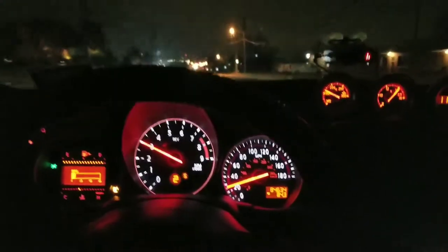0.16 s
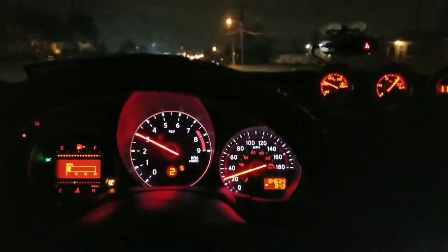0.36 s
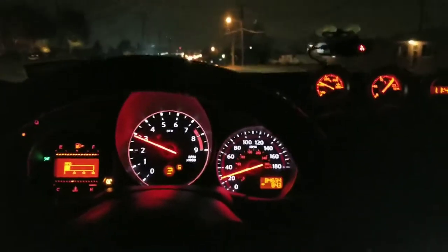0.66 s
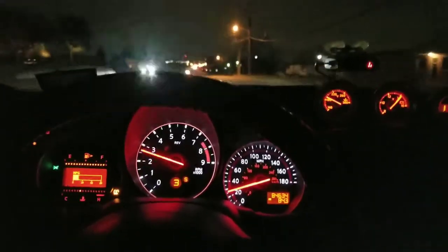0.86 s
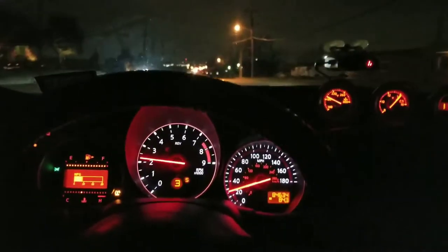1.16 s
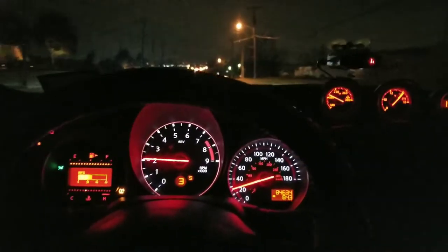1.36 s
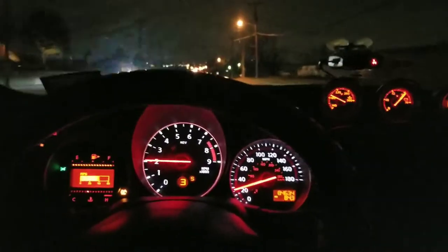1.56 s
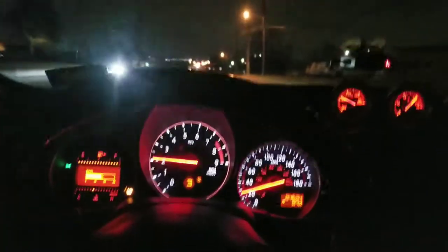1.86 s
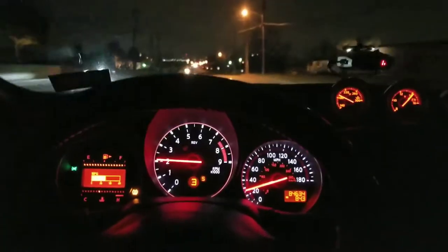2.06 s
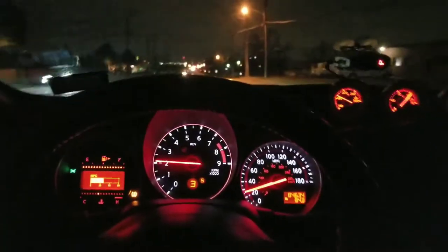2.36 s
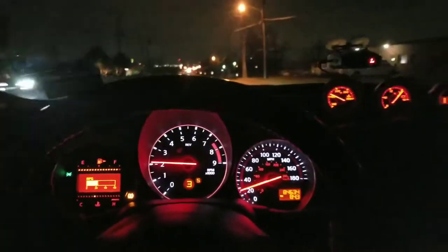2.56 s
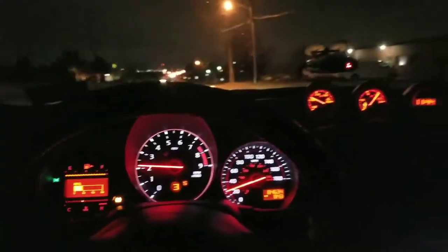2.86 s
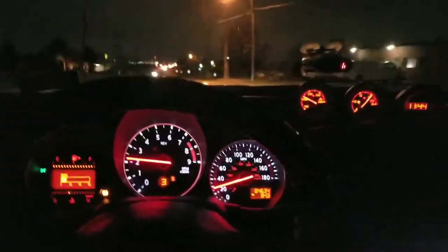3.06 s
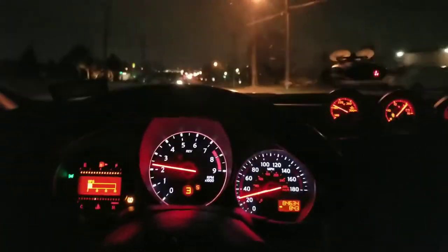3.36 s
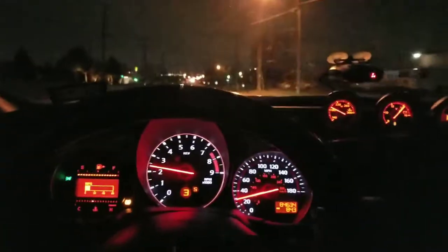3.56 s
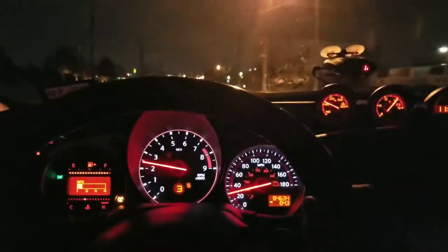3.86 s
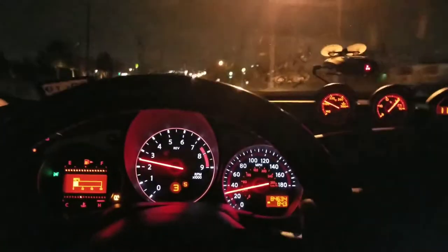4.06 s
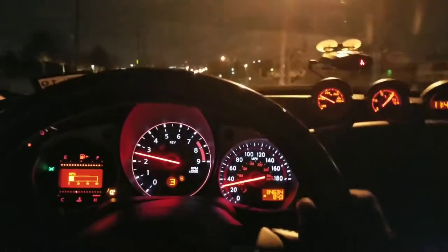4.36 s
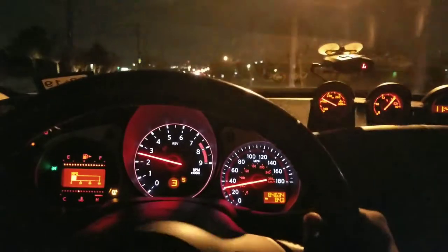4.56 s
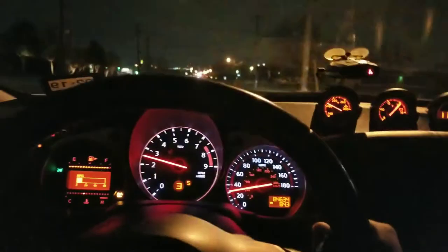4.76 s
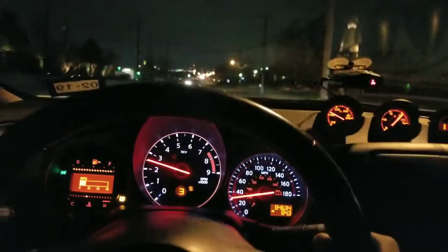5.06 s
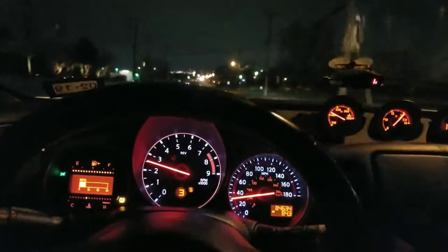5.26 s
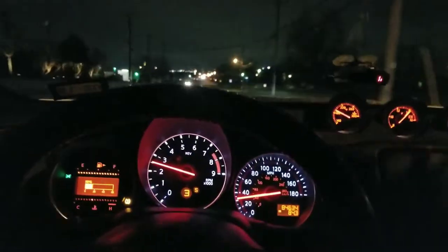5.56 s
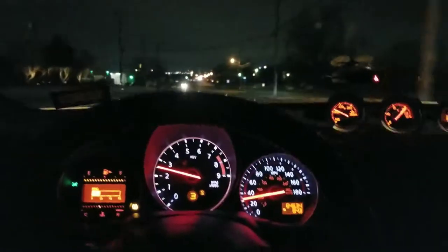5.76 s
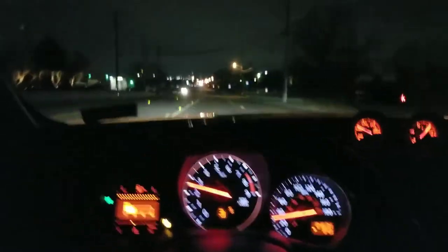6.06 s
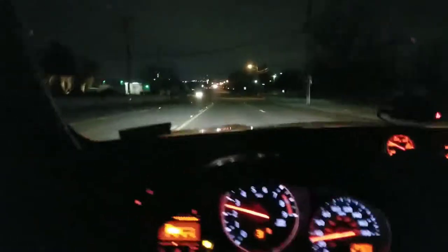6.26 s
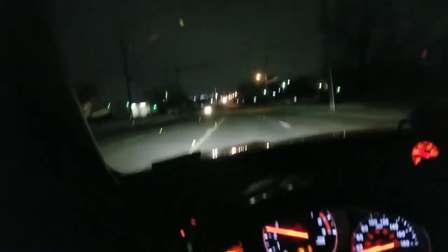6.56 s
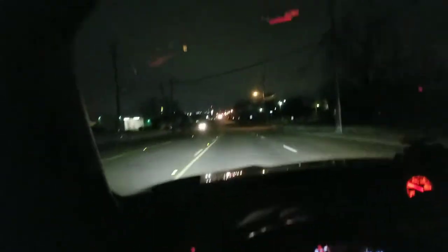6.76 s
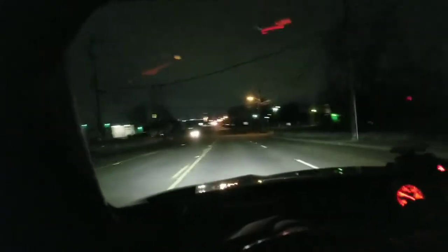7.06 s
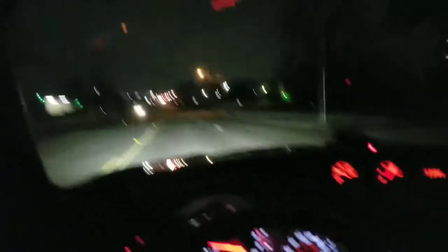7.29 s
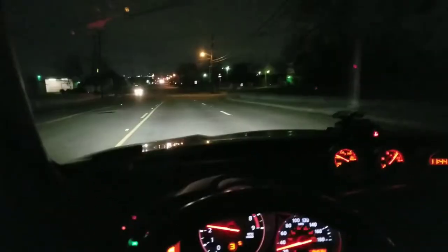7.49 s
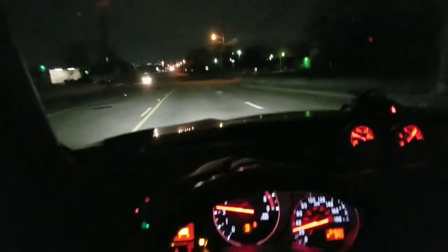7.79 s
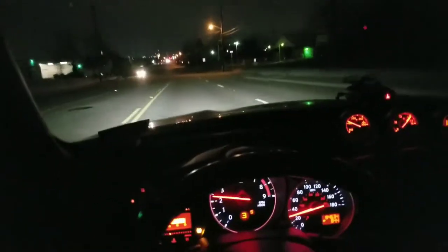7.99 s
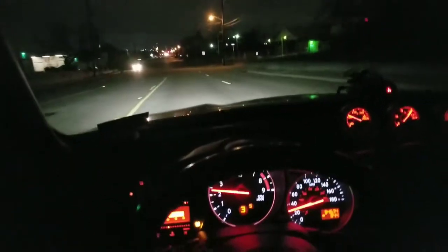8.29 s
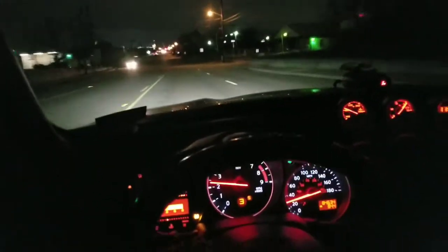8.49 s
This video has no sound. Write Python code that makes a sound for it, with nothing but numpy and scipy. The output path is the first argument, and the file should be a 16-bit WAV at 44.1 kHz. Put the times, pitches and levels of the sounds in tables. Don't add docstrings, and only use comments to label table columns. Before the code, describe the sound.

Heard from a handheld camera inside a moving car, a throaty six-cylinder engine with open exhaust starts high, gives short raspy bursts, and slides down in pitch through a gear change. Low muffled pops follow off the throttle, then the engine pulls again, climbing slightly and settling into a resonant drone. Tyres rumble, air hisses faintly, loose trim buzzes, and dry plastic ticks multiply toward the end.

```python
import sys
import numpy as np
from scipy import signal
from scipy.fft import rfft, irfft, next_fast_len
from scipy.io import wavfile
from scipy.ndimage import uniform_filter1d, map_coordinates

SR = 44100
rng = np.random.default_rng(int(sys.argv[2]) if len(sys.argv) > 2 else 0)


def linear_from_db(decibels):
    return 10 ** (np.asarray(decibels, float) / 20)


def file_out(sig):
    cols = np.atleast_2d(sig).T
    lim = np.clip(cols, -1, 1)
    pcm = np.round(lim * 32767).astype(np.int16)
    wavfile.write(sys.argv[1], SR, pcm)


N = 380583

MID_LOAD_DB = -28


def unit(x):
    return x / np.sqrt(np.mean(x ** 2) + 1e-20)


def along(points, hz):
    f, value = np.transpose(points)
    return np.interp(np.log(hz + 1), np.log(f + 1), value)


def curves(rows):
    s, *columns = np.transpose(rows)
    return [np.interp(np.arange(N) / SR, s, column) for column in columns]


def wobble(rate):
    knots = rng.standard_normal(int(N * rate / SR) + 4)
    return map_coordinates(knots, [np.arange(N) * rate / SR])


def swell(middle, length):
    phase = np.clip((np.arange(N) / SR - middle) / length, -.5, .5)
    return np.cos(np.pi * phase) ** 2


def filtered(x, response):
    m = next_fast_len(N + SR // 2)
    return irfft(rfft(x, m) * response(np.fft.rfftfreq(m, 1 / SR)), m)[..., :N]


def rush(response):
    # f/Hz, likeness [0 to 1]
    alike = [(60, 0.89), (130, 1), (290, 0.82), (640, 0.91), (1200, 0), (15000, 0.13)]

    def mid_and_side(hz):
        turn = np.arccos(np.clip(along(alike, hz), -1, 1)) / 2
        return response(hz) * [np.cos(turn), np.sin(turn)]

    mid, side = filtered(rng.standard_normal((2, N)), mid_and_side)
    return unit(np.array([mid + side, mid - side]))


def controls():
    # t/s, firing rate/Hz, boom level/dB, load/dB, cylinder unevenness/dB
    engine_course = [(0.0, 148.3, -9, -41.5, -46.5), (0.16, 146.9, -13.5, -33.5, -43),
                     (0.45, 145, -11, -43.5, -44), (0.72, 135.9, -5, -42, -35),
                     (0.95, 120.1, -15, -42, -35.5), (1.2, 103.8, -9, -33.5, -33),
                     (1.28, 98.54, -26, -50, -25.5), (1.62, 97.99, -26.5, -46.5, -24),
                     (1.9, 104.7, -16, -39, -29.5), (2.1, 101.4, -21.5, -39, -25.5),
                     (2.65, 105.2, -5, -25.5, -18), (3.15, 109.8, -7, -27, -24.5),
                     (4.0, 120.8, -12.5, -27.5, -22), (4.95, 124.7, -14, -28, -30),
                     (5.45, 124.5, -8.5, -19, -25), (6.2, 123.7, -11, -16.5, -27),
                     (7.3, 116.4, -8, -15.5, -28), (8.63, 112, -9, -18.5, -28.5)]
    # t/s, roughness/dB
    surface = [(0.0, -26.5), (0.4, -32.5), (0.47, -20), (0.7, -26), (0.82, -18.5), (1.05, -23), (1.5, -30),
               (2.1, -32.5), (2.5, -24.5), (5.1, -26.5), (5.35, -19), (5.8, -19), (6.4, -22.5), (7.1, -26),
               (8.1, -29.5), (8.3, -24.5), (8.63, -26)]
    # t/s, sharpness/dB
    sharpness = [(0, 0), (.8, 0.5), (.92, 8), (1.2, -0.5), (2.3, -4.5), (2.75, 4.5), (3.0, 4), (3.3, -4),
                 (4.2, -7.5), (5.2, -8), (5.5, -3), (5.95, -1), (6.3, -0.5), (6.7, -4), (7.3, -3),
                 (8.63, -6.5)]
    # t/s, rise/s, fall to -20 dB/s, gas burst level/dB, trim shake level/dB
    jerks = [
        (0.503, .1, 0.02, -18, -63.5),
        (0.55, .02, 0.2, -24.5, -70),
        (0.79, .02, 0.16, -23.5, -58.5),
        (0.94, 0.12, 0.22, -18.5, -45),
        (1.25, .22, 0.2, -38.5, -50.5),
        (2.7, 0.35, 2, -37, -63),
        (5.4, .5, 2, -37.5, -58.5),
        (5.87, 0.035, 0.48, -23.5, -36),
        (6.25, .3, 1.0, -22.5, -46.5),
        (8.363, .003, 0.03, -18, -56.5),
    ]
    # t/s, depth/dB, fall/s, recovery/s
    stumbles = [
        (0.5, -4.5, 0.015, 0.024),
        (5.795, -9.5, .025, .04),
        (8.38, -3.5, .04, .3),
    ]
    t = np.arange(N) / SR
    hz, boom_db, load_db, uneven_db = curves(engine_course)
    (rough_db,), (sharp_db,) = curves(surface), curves(sharpness)
    load = load_db - MID_LOAD_DB
    burst, shake = np.zeros((2, N))
    for s, rise, fall, burst_db, shake_db in jerks:
        shape = np.where(t < s, np.clip(1 + (t - s) / rise, 0, 1), linear_from_db(-20 * np.abs(t - s) / fall))
        burst += linear_from_db(burst_db) * shape
        shake += linear_from_db(shake_db) * shape
    dip_db = sum(np.interp(t, [s - fall, s, s + back], [0, db, 0]) for s, db, fall, back in stumbles)
    gas = linear_from_db(-33.5 + 0.65 * load + 0.36 * (boom_db + 12)) + burst
    hiss = linear_from_db(-48 + 0.41 * load) + linear_from_db(-37.5) * burst + linear_from_db(-2.5) * shake
    even_db = -26.5 + .9 * load + 0.45 * (uneven_db - MID_LOAD_DB) + sharp_db + dip_db
    return dict(hz=hz, boom=boom_db + dip_db, even=even_db, low=uneven_db, high=load_db, body=rough_db,
                gas=20 * np.log10(gas), hiss=20 * np.log10(hiss),
                buzz=20 * np.log10(linear_from_db(-65.5) + shake),
                rumble=-34 + 0.093 * load + .15 * (rough_db + 25))


def pipe(f):
    # f/Hz, width/Hz, level/dB
    resonances = [(100, 28, -6), (145, 44, 0), (188.2, 24, 0), (240.4, 44, -5.5), (302, 34, -1.5),
                  (386.4, 30, -2.5), (418, 18, -8.5), (506.6, 38.7, -4.5), (625.6, 44, -11),
                  (739.8, 38, -14.5), (869, 54, -22.5), (997, 40, -16.5), (1156.4, 60, -22.5),
                  (1383, 80, -26.5), (1633, 150, -32.5)]
    grid = np.arange(4000.)
    gain = 0
    for centre, width, db in resonances:
        once = 1j * grid * width / (centre * centre - grid * grid + 1j * grid * width)
        gain = gain + linear_from_db(db) * once ** 2
    return np.interp(f, grid, gain, right=0)


def cycle_wave(cycles, orders, scatter_db, smear, drift_rate, apart):
    cylinders = [2.5, -4, -4, -9, -5.5, 0]
    size = 4096
    lines = np.zeros((2, size // 2 + 1), complex)
    draw = rng.standard_normal((3, len(orders)))
    pattern_db = np.array(cylinders)[(orders - 1) % 6]
    pattern_db = -4 + (pattern_db + 4) * np.clip((54 - orders) / 24, .25, 1)
    lines[0, orders] = linear_from_db(pattern_db) * np.exp(1j * smear * draw[0])
    lines[1, orders] = lines[0, orders] * linear_from_db(scatter_db) * (draw[1] + 1j * draw[2])
    steady, change = irfft(lines, size)[:, (cycles % 1 * size).astype(int)]
    return steady + (wobble(drift_rate) + apart * np.array([[1], [-1]])) * change


def firing_boom(hz, boom_db, load_db, firing):
    load = load_db - MID_LOAD_DB
    octave = linear_from_db(-22.5 + 0.65 * load) + linear_from_db(-24.5)
    octave_phase = 1.2 * np.arctan((2 * hz - 234) / 6)
    boom = np.sin(firing) + octave * np.sin(2 * firing + octave_phase)
    boom = np.sqrt(2) * linear_from_db(boom_db + 0.69 * wobble(25)) * boom
    half = np.sqrt(2) * linear_from_db(-40.5 + 0.33 * load + 1.5 * wobble(4)) * np.sin(firing / 2)
    return boom + half


def exhaust_tones(cycles, burn, shake, beat, levels):
    order = np.arange(1, 90)
    between = order[order % 6 > 0]
    even = cycle_wave(cycles, order[17::6], scatter_db=-13, smear=3, drift_rate=1, apart=1.3)
    low = cycle_wave(cycles, between[:10], scatter_db=-10, smear=3, drift_rate=1, apart=.1)
    high = cycle_wave(cycles, between[10:], scatter_db=-11, smear=1.8, drift_rate=1, apart=1.1)
    knock = cycle_wave(cycles + .17, order[17:], scatter_db=-8, smear=.45, drift_rate=6, apart=1)
    knock = np.gradient(knock, axis=1)
    even, low, high, knock = map(unit, filtered(burn * np.array([even, low, high, knock]), pipe))
    even = filtered(even, lambda f: 1 / np.sqrt(1 + (f / 1000) ** 4))
    upper = linear_from_db(levels["even"] - 9.5) * even + linear_from_db(levels["high"] - 5.5) * high
    edge = filtered(upper, lambda f: 1 / (1 + (640 / (f + 1)) ** 8))
    brighten = np.clip((levels["high"] + 24) / 9, 0, 1.5)
    pulsed = linear_from_db(-14 * shake * (beat - .3))
    tones = linear_from_db(levels["low"] + 2.0) * low + np.cbrt(pulsed) * (upper - edge)
    tones = tones + pulsed * (1 + 0.81 * brighten) * edge
    tones = tones + np.sqrt(shake) * linear_from_db(levels["gas"] - 4.5) * knock
    return tones + shake * linear_from_db(levels["gas"] - 14) * pulsed * gas_snarl(cycles, burn)


def gas_snarl(cycles, burn):
    # f/Hz, level/dB
    snarl_colour = [(900, -29.5), (1380, 1), (1900, -5), (2600, -6.5), (3100, -20), (4000, -50)]
    snarl = cycle_wave(cycles, np.arange(48, 180, 6), scatter_db=-10, smear=3, drift_rate=4, apart=1)
    return unit(filtered(burn * snarl, lambda f: linear_from_db(along(snarl_colour, f))))


def gas_rasp(firing, shake, beat, gas_db):
    puff = linear_from_db(-20 * shake * beat + 2.5 * np.cos(firing))
    noise = rush(lambda f: np.abs(pipe(f)) * np.clip(f / 330, .01, 4.5) ** .5 * (f > 250))
    rasp = unit(puff * noise)
    return linear_from_db(gas_db - 12.5 + 2.5 * wobble(6.3)) * rasp


def trim_buzz(beat, shake, buzz_db):
    # f/Hz, level per Hz/dB
    buzz_colour = [(800, -29.5), (1400, -3.5), (2600, 2.5), (3500, -9), (4500, -12), (6000, -9),
                   (7400, -18), (8500, -41), (15500, -66)]
    chatter = linear_from_db(shake * (-11 * beat + 0.65 * wobble(70)) + 0.54 * wobble(16))
    body = rush(lambda f: linear_from_db(along(buzz_colour, f)))
    bright = rush(lambda f: 1 / (1 + ((f - 11500) / 3000) ** 4))
    ring = rush(lambda f: 1 / (1 + ((f - 4520) / 120) ** 2)) * [[1], [.4]]
    late = .55
    chirp = linear_from_db(-22 * ((beat - late) % 1) + 2 * wobble(15) + .5 * buzz_db)
    extra = linear_from_db(-22.5) * shake ** 3 * bright + linear_from_db(-23) * shake ** 4 * unit(chirp * ring)
    return linear_from_db(buzz_db + 6.5) * (unit(chatter * body) + shake ** 2 * extra)


def engine(levels):
    # f/Hz, lead/rad
    left_lead = [(100, 0), (430, 0.4), (780, 1.21), (1030, 2), (1800, 2.5)]
    hz = levels["hz"]
    cycles = np.cumsum(hz * (1 + .003 * wobble(9))) / SR / 6
    knock_s = 6.103
    cycles = cycles - cycles[round(knock_s * SR)] - .17
    firing = 2 * np.pi * 6 * cycles
    burn = linear_from_db(.6 * wobble(60))
    shake = np.clip((levels["buzz"] + 62) / 11, 0, 1)
    beat = uniform_filter1d((cycles + .17) % 1, size=300)
    tones = firing_boom(hz, levels["boom"], levels["high"], firing)
    tones = tones + exhaust_tones(cycles, burn, shake, beat, levels)
    tones = filtered(tones, lambda f: np.exp(.5j * np.outer([1, -1], along(left_lead, f))))
    return tones + gas_rasp(firing, shake, beat, levels["gas"]) + trim_buzz(beat, shake, levels["buzz"])


def road(levels):
    # f/Hz, level per Hz/dB
    tyre_colour = [(15, -29), (28, -1.5), (55, -3.5), (75, -4), (95, 0), (130, -24.5), (200, -64.5)]
    panel_colour = [(70, -34.5), (110, -7), (145, -5), (168, 0.5), (190, 2.5), (230, -11.5), (300, -7),
                    (420, -22.5), (550, -21.5), (950, -30.5), (1500, -75)]
    air_colour = [(500, -26), (950, 6.5), (1300, -2), (2000, -5), (2700, -8), (3200, -21.5), (5000, -20.5),
                  (7000, -37), (9000, -66), (10800, -66), (12500, -75), (15500, -82)]
    rumble = linear_from_db(levels["rumble"] + 1.5 + 0.43 * wobble(15)) * rush(lambda f: linear_from_db(along(tyre_colour, f)))
    drumming = linear_from_db(levels["body"] + 0.5 + 1.2 * wobble(13)) * rush(lambda f: linear_from_db(along(panel_colour, f)))
    hiss = linear_from_db(levels["hiss"] + 5.5 + 0.47 * wobble(11)) * rush(lambda f: linear_from_db(along(air_colour, f)))
    return rumble + drumming + hiss


def ticks():
    # t/s, peak level/dB, brightness/dB, left-right difference/dB
    tick_events = [(0.1542, -55, -18, -10), (0.3889, -47.5, -25, 3), (1.2827, -36.5, -16, -3.5),
                   (4.966, -52.5, -20, 10), (5.7522, -41.5, -21.5, -2), (5.7738, -37.5, -22.5, -8),
                   (5.795, -42, -17, -4), (5.834, -42, -11, -3.5), (5.8625, -40, -12, 0),
                   (6.3994, -44, -12, 0), (6.4218, -34.5, -20.5, 5.5), (6.4556, -41.5, -21.5, -1),
                   (6.8125, -42, -19.5, -4.5), (6.8784, -32, -25, 0), (7.7895, -55.5, -17.5, -3),
                   (7.822, -45, -16, -7), (7.8517, -45.5, -17, -5.5), (7.9156, -37, -26, -1.5),
                   (7.951, -40, -28.5, -3), (8.0087, -33.5, -22, -2.5), (8.0536, -44, -20, -3),
                   (8.115, -36, -23.5, -6.5), (8.144, -47, -25.5, 2), (8.1782, -35.5, -22, -0.5),
                   (8.21, -50.5, -13, -2), (8.3949, -29, -27.5, 3), (8.522, -28, -25, 0.5),
                   (8.5416, -47, -17.5, -4), (8.5541, -44, -11, -9), (8.567, -48, -5, -6.5),
                   (8.5758, -40, -1, -7.5), (8.582, -42, -1, -7), (8.5879, -42, -1.5, -6.5),
                   (8.597, -44, -2, -6), (8.604, -44, -4.5, -6)]
    t = np.arange(SR // 20) / SR
    fade = linear_from_db(-60 * t / [[[.04]], [[.018]]])
    fade = fade * (1 - np.exp(-t / 0.0003))
    body, edge = np.zeros((2, 2, N + SR))
    for s, db, bright_db, pan_db in tick_events:
        side = linear_from_db(db + np.array([[.5], [-.5]]) * pan_db)
        crack = fade * rng.standard_normal((2, 2, len(t)))
        body[:, round(s * SR):][:, :len(t)] += side * crack[0]
        edge[:, round(s * SR):][:, :len(t)] += side * linear_from_db(bright_db) * crack[1]

    def band(hz, wide):
        return lambda f: 1j * f * wide / (hz * hz - f * f + 1j * f * wide)

    dull = filtered(filtered(body[:, :N], band(4600, 2800)), band(4600, 2800))
    bright = filtered(edge[:, :N], band(11500, 9000))
    return linear_from_db(3.0) * dull + linear_from_db(12.0) * bright


def rustles():
    # middle t/s, length/s, level/dB
    rubs = [(.21, .3, -71), (.92, .16, -66), (1.2, .14, -66), (1.281, .08, -66), (5.051, .25, -72),
            (5.38, .2, -69), (5.6, .5, -74), (5.81, .16, -64), (6.271, .15, -68), (6.42, .08, -62),
            (6.481, .07, -65.5), (6.82, .25, -71), (8.17, .3, -76), (8.59, .06, -58)]
    # f/Hz, level per Hz/dB
    cloth_colour = [(3000, -30), (5000, -10), (8500, -12), (10800, 0), (12500, -8), (15500, -11)]
    level = sum(linear_from_db(db) * swell(s, length) for s, length, db in rubs)
    grains = linear_from_db(3 * wobble(60)) * rush(lambda f: linear_from_db(along(cloth_colour, f)))
    return linear_from_db(3) * level * unit(grains)


def pops():
    # t/s, peak level/dB, f/Hz, time to fall 60 dB/s
    pop_events = [(.42, -22, 92, .25), (.47, -22, 92, .25), (1.346, -14.5, 187.6, .15),
                  (1.40, -18.5, 185, .12), (1.526, -12, 140, 0.11), (1.565, -19, 165, .1),
                  (1.687, -17, 145, .1), (1.72, -19, 179.7, .1), (1.748, -16.5, 150, .1),
                  (1.94, -18.5, 185, .1), (2.059, -17, 183, .12), (2.18, -18, 185, .1),
                  (2.292, -16, 185, .12)]
    out, t = np.zeros(N), np.arange(SR // 4) / SR
    for s, db, hz, t60 in pop_events:
        ring = np.sin(2 * np.pi * hz * t) + linear_from_db(-18) * np.sin(2 * np.pi * 1.62 * hz * t)
        rise = 1 - np.exp(-t / .008)
        out[round(s * SR):][:len(t)] += linear_from_db(db - 60 * t / t60) * rise * 2 * ring
    return out


def colour_shifts(x):
    # middle t/s, length/s, f/Hz, width/Hz, level change/dB
    band_swells = [(0.18, .5, 420, 40, 11.5), (.3, 0.76, 350, 50, -5), (.95, .4, 500, 60, -6),
                   (1.0, .4, 350, 81, 6), (.8, .4, 188, 28, 3), (.95, .4, 1000, 80, -3.5),
                   (1.4, .5, 495, 46, 5.5), (1.25, .3, 530, 60, -5), (2.8, 0.79, 525, 50, 6),
                   (2.85, 1.0, 375, 50, -7), (3.2, 1.2, 325, 46, 6), (3.0, .9, 205, 40, -4),
                   (2.7, 1.0, 700, 160, -4.5), (3.7, 1.0, 412, 25, 9), (3.8, .9, 270, 69, 4),
                   (4.4, 1.0, 250, 50, -4.5), (4.3, 1.4, 385, 25, -8), (5.4, 0.64, 510, 50, 4),
                   (5.55, 0.79, 400, 70, -8), (6.2, 0.83, 620, 50, -4.5), (6.4, 0.88, 1000, 60, -2.5),
                   (6.65, .9, 380, 45, 5.5), (6.7, 1.0, 720, 90, 4.5), (7.6, 1.8, 560, 140, -4),
                   (7.3, .6, 390, 50, 4.5), (7.9, .9, 385, 50, -3.5), (7.4, 2.2, 668, 40, 6),
                   (7.9, 1.2, 270, 69, -3), (8.0, 1.3, 850, 120, -4), (8.45, .4, 420, 56, 5),
                   (.45, .5, 430, 40, 8), (3.4, .6, 530, 40, 7), (3.35, .5, 740, 200, 6),
                   (4.6, 1.0, 415, 25, 8), (4.55, .8, 312, 30, 6), (5.4, 1.0, 905, 50, 6),
                   (5.75, 1.1, 790, 40, 6), (6.3, .8, 440, 40, -7), (7.2, 2.4, 935, 60, -5),
                   (8.1, 1.4, 345, 30, -6)]
    out = x.copy()
    for s, length, hz, wide, db in band_swells:
        a, b = max(round((s - length) * SR), 0), round((s + length) * SR)
        band = signal.lfilter(*signal.iirpeak(hz, hz / max(wide, 10), SR), x[:, a:b])
        out[:, a:b] += (linear_from_db(db) - 1) * swell(s, length)[a:b] * band
    return out


def scene():
    levels = controls()
    return colour_shifts(engine(levels) + road(levels) + pops()) + ticks() + rustles()


def band_limit(x):
    return signal.sosfilt(signal.butter(12, 15820, fs=SR, output="sos"), x)


def record(dry):
    # f/Hz, left-right difference/dB
    port_lean = [(60, -1), (200, -1), (380, 0.3), (700, 3), (1290, 0), (2380, 7), (4400, 4), (8120, -1),
                 (15000, -1.5)]
    # f/Hz, level change/dB
    lifted = [(400, 0), (560, -2), (1000, 2.5), (1600, -1.5), (2150, 2.5), (2900, -5), (4500, -1),
              (8000, -0.5)]
    x = filtered(dry, lambda f: linear_from_db(np.outer([.5, -.5], along(port_lean, f))))
    raised = np.interp(np.arange(N) / SR, [6.4, 7.0], [0, 1])
    x = x + raised * filtered(x, lambda f: linear_from_db(along(lifted, f)) - 1)
    x = x / (1 + np.abs(x) ** 8) ** (1 / 8)
    return band_limit(x)


dry = scene()
out = record(dry)
file_out(out)
```